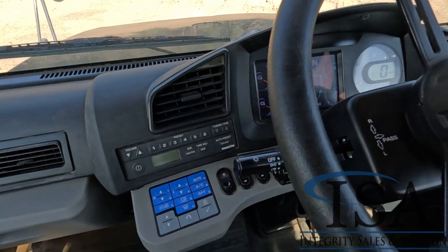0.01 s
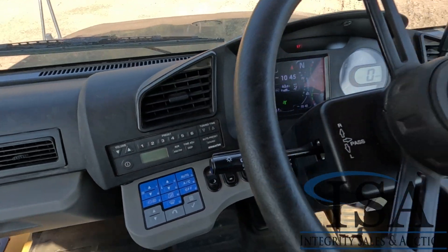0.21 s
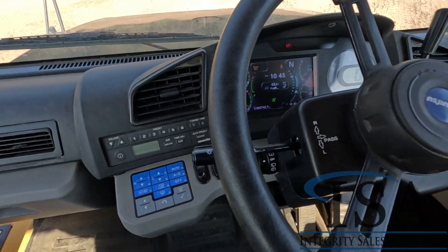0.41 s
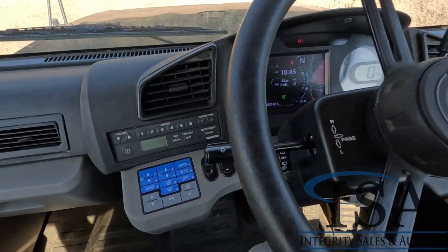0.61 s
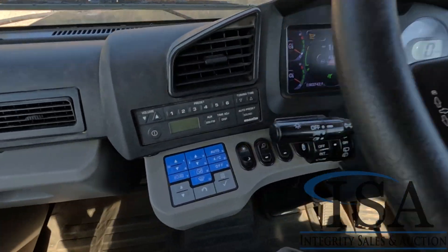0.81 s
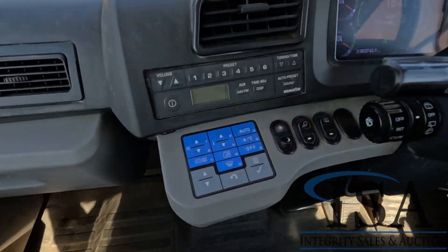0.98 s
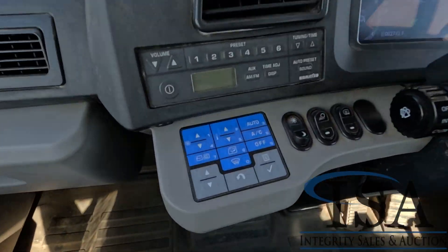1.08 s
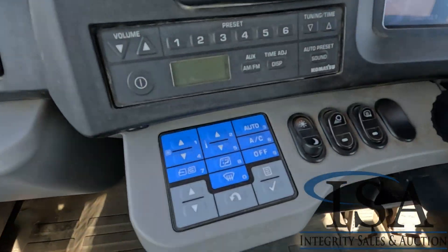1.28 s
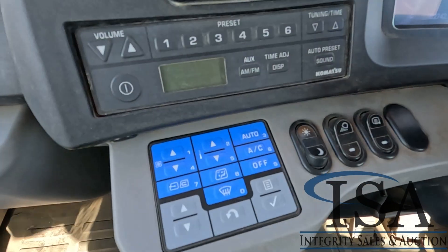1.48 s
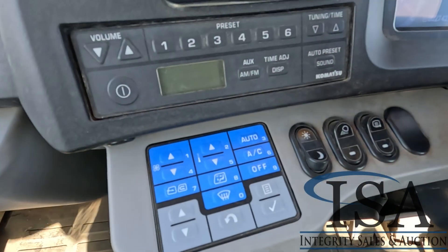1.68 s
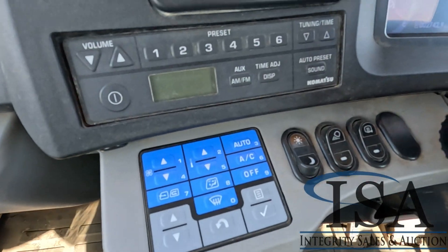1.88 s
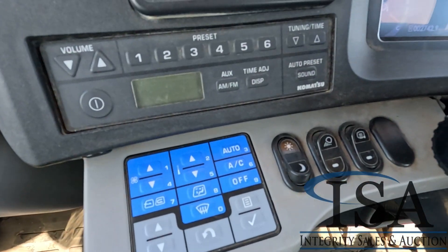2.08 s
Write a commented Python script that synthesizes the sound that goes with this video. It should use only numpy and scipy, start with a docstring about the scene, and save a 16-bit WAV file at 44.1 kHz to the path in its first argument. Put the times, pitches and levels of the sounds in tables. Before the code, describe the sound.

A heavy vehicle door slams shut with a rattle, muffling the idling diesel engine inside the cab

```python
"""Diesel cab, door pulled shut

Inside the cab of a large idling diesel: a wobbling low hum, whining tones, noise rumble and clatter. The door
swings in near the middle: air is squeezed and wobbles as a low tone, the seal hisses, latch and trim rattle as
noise bursts over ringing panel modes, and the shut door lands with a thud. The idle turns dull and swells back
slowly, with small dry ticks; soft modal thumps of someone settling come from the right of the microphone."""
import sys
import numpy as np
from scipy import signal
from scipy.fft import rfft, irfft
from scipy.io import wavfile
from scipy.ndimage import uniform_filter1d

SR = 44100
rng = np.random.default_rng(int(sys.argv[2]) if len(sys.argv) > 2 else 0)


def makeup_ratio(level_db):
    """Linear amplitude ratio for a level in decibels (20 dB per factor of ten)."""
    decades = np.asarray(level_db, float) / 20
    return 10 ** decades


def transcribe(u):
    """Save the signal u as a 16-bit wav file named by the first command-line argument.

    u: samples, shape (n,) or (channels, n), limited to [-1, 1]; the rate is SR.
    q: integer samples, one column per channel.
    """
    v = np.clip(np.atleast_2d(u).T, -1, 1)
    q = np.round(v * 32767).astype(np.int16)
    wavfile.write(sys.argv[1], SR, q)


N = 94815
T = np.arange(N) / SR


def evened(x):
    """Scales to unit rms."""
    return x / np.sqrt(np.mean(x ** 2) + 1e-20)


def read(points, hz):
    """Reads a spectrum on a log-frequency axis."""
    f, value = np.transpose(points)
    return np.interp(np.log(hz + 1), np.log(f + 1), value)


def curve(table, column):
    """One column of a table over time."""
    rows = np.array(table)
    return np.interp(T, rows[:, 0], rows[:, column])


def slow(hz):
    """Random drift of unit rms, mostly below hz."""
    spectrum = rfft(rng.standard_normal(N))
    return evened(irfft(spectrum / (1 + (np.fft.rfftfreq(N, 1 / SR) / hz) ** 4), N))


def sides(db):
    """Left and right gains for a level difference."""
    return makeup_ratio(np.array([[db / 2], [-db / 2]]))


def hiss(spectrum, same, lean, patchy_db, size):
    """Stereo noise of unit rms with a spectrum, left-right likeness and balance, and drifting patches."""
    hop = size // 4
    frames, hz = N // hop + 5, np.fft.rfftfreq(size, 1 / SR)
    a, b, c, d, patches = rng.standard_normal((frames, len(hz), 5)).T
    patches = uniform_filter1d(patches, size=8, axis=0)
    patches = evened(uniform_filter1d(patches, size=8, axis=1))
    like = np.clip(read(same, hz), -1, 1)[:, None]
    half_lean_db = read(lean, hz)[:, None] / 2
    left = a + 1j * b
    right = like * left + np.sqrt(1 - like ** 2) * (c + 1j * d)
    z = np.array([left * makeup_ratio(half_lean_db), right * makeup_ratio(-half_lean_db)])
    z = z * makeup_ratio(read(spectrum, hz)[:, None] + patchy_db * patches)
    return evened(signal.istft(z, nperseg=size, noverlap=size - hop)[1][:, :N])


def ring(modes, spread):
    """One blow on a set of decaying modes, each a little different every time."""
    t = T[:SR // 3]
    out = np.zeros(len(t))
    for (hz, db, t60), (level, tuning) in zip(modes, rng.standard_normal((len(modes), 2))):
        decay = makeup_ratio(db + 2.56 * level - 60 * t / t60)
        out += decay * np.sin(2 * np.pi * hz * (1 + spread * tuning) * t)
    return out


def burst(start_s, length_s, t60_s):
    """Envelope: 1.2 ms rise, hold, exponential release."""
    t = T - start_s
    return np.clip(t / 0.0012, 0, 1) * makeup_ratio(-60 * np.clip(t - length_s, 0, 2) / t60_s)


def add(mix, start_s, sound):
    """Mixes a stereo sound in at its start."""
    part = mix[:, round(start_s * SR):][:, :sound.shape[1]]
    part += sound[:, :part.shape[1]]


FIRING_HZ, FIRING_WOBBLE = 35.46, 0.04  # mean rate; rms wobble as a share of it
HUM_FLUTTER_DB = 1  # rms
# low hum in the cab: firing hum, then, after the door shuts, pulses with the air still swinging in them:
# time_s, level_db
HUM_LEVEL = [(0, -27), (.3, -25), (.45, -22.5), (.58, -24), (.61, -24), (.95, -42), (1.02, -20),
             (1.09, -35.5), (1.16, -30.5), (1.27, -41.5), (1.36, -34), (1.42, -41), (1.55, -31),
             (1.72, -29), (1.8, -46.5), (1.9, -28.5), (1.96, -45), (2.09, -29), (2.15, -39)]
# partials over the hum: multiple of the firing rate, level_db relative to the hum
HUM_ORDERS = [(2, -25), (2.67, -16.5), (3, -25), (4, -21)]


def low_hum(turns):
    """A sine at the firing rate with fluttering partials above it, pulsing once the door is shut."""
    hum = np.sin(2 * np.pi * turns)
    for multiple, db in HUM_ORDERS:
        flutter = makeup_ratio(db + 2.94 * slow(3.9))
        hum = hum + flutter * np.sin(2 * np.pi * (multiple * turns + rng.random()))
    return np.sqrt(2) * makeup_ratio(curve(HUM_LEVEL, column=1) + HUM_FLUTTER_DB * slow(16.5)) * hum


TONE_WIDTH_HZ = 1.2  # rms pitch drift
# tones of pump or fan: pitch_hz, level_db before the idle's changes
WHINE_TONES = [(225, -45.5), (338, -45), (506, -58.5)]


def whine():
    """Turning pump or fan: sines that drift a little in pitch and level."""
    out = np.zeros(N)
    for hz, db in WHINE_TONES:
        cycles = np.cumsum(hz + TONE_WIDTH_HZ * slow(8.1)) / SR
        out += makeup_ratio(db + 1.85 * slow(1.0)) * np.sin(2 * np.pi * cycles)
    return np.sqrt(2) * out


# lowest noise in the cab: frequency_hz, relative density_db
RUMBLE_SPECTRUM = [(4.7, -38), (8.0, -27), (21, -0.5), (38, -4.5), (59, -5.5), (97, -7), (200, -17),
                   (260, -41), (440, -120)]
# dull noise, shared by rumble and drone: frequency_hz, left-right likeness
DULL_SAME = [(60, 0.97), (180, 1), (550, 0.8), (1650, 0.94), (4970, 0.8), (15000, 0.93)]
# its balance: frequency_hz, left minus right_db
DULL_LEAN = [(60, -2.5), (240, -2.5), (950, -1), (3770, 2.5), (15000, -1.5)]


def rumble():
    """Low engine vibration as stereo noise of unit rms."""
    return hiss(RUMBLE_SPECTRUM, DULL_SAME, DULL_LEAN, patchy_db=-0.5, size=4096)


def knocking(turns):
    """Each firing gives the clatter a fresh pulse that decays over the firing cycle."""
    depth, decay_cycles = 0.29, 0.77
    return evened(1 - depth + depth * np.exp(-(turns % 1) / decay_cycles))


# bright engine clatter from outside: frequency_hz, relative density_db
BRIGHT_SPECTRUM = [(120, -33), (200, -2), (339, -4), (365, -24), (430, -13), (812, -5.5), (1100, -8.5),
                   (1590, -15.5), (3810, -24), (6710, -33.5), (12200, -51.5), (15500, -92)]
# its stereo: frequency_hz, left-right likeness
BRIGHT_SAME = [(60, 0.88), (180, 1), (550, 0.98), (1650, 0.72), (4970, 0.64), (15000, 0.64)]
# its balance: frequency_hz, left minus right_db
BRIGHT_LEAN = [(60, 8.5), (240, 2.5), (950, 1.5), (3770, 4), (15000, 3)]


def bright_clatter():
    """Bright engine clatter from outside as stereo noise; it drops as the door shuts, then creeps back."""
    return hiss(BRIGHT_SPECTRUM, BRIGHT_SAME, BRIGHT_LEAN, patchy_db=1.7, size=1024)


# muffled engine noise in the cab: frequency_hz, relative density_db
MUFFLED_SPECTRUM = [(120, -21), (200, -3.5), (263, -2), (307, -3.5), (340, -2), (364, -10), (569, -15),
                    (609, -18), (815, -17.5), (1510, -26), (2250, -30.5), (2720, -31.5), (3200, -35),
                    (4080, -37.5), (8670, -57), (12000, -85), (15600, -115), (22000, -120)]


def muffled_drone():
    """Engine noise inside the cab, with its treble held back."""
    return hiss(MUFFLED_SPECTRUM, DULL_SAME, DULL_LEAN, patchy_db=2.4, size=1024)


# idle heard in the cab: time_s, rumble_db, bright clatter_db, muffled drone_db, change of the tones_db
IDLE_LEVELS = [(0, -40, -45, -49, -5), (.2, -43.5, -42.5, -48, -3), (.45, -31.5, -41, -46.5, -2.5),
               (.6, -38, -40.5, -47, -4.5), (.66, -26, -42.5, -44.5, -6), (.9, -32, -83, -40.5, -20),
               (.97, -46, -75.5, -43, -30), (1.06, -33.5, -98, -46.5, -16), (1.18, -31.5, -87.5, -46, -20),
               (1.3, -32, -82.5, -42, -3), (1.5, -28, -72.5, -44.5, -2.5), (1.7, -33, -66, -42.5, -0.5),
               (1.88, -28.5, -60, -40.5, 0), (2.0, -33.5, -58, -40, 0.5), (2.15, -36, -56, -40, -7)]


def engine():
    """One wobbling firing rate drives hum and knocking; the noises follow their own level curves."""
    turns = np.cumsum(FIRING_HZ * (1 + FIRING_WOBBLE * slow(4.3))) / SR
    rumble_gain, bright_gain, muffled_gain, tone_gain = (makeup_ratio(curve(IDLE_LEVELS, k)) for k in range(1, 5))
    clatter = bright_gain * bright_clatter() + muffled_gain * muffled_drone()
    return low_hum(turns) + tone_gain * whine() + rumble_gain * rumble() + knocking(turns) * clatter


# small dry ticks in the cab: start_s, level_db, length_s, centre_hz, width_hz
TICK_EVENTS = [(0.221, -44, 0.0034, 3800, 6850), (0.227, -51.5, 0.0028, 5400, 9800),
               (1.034, -68.5, 0.019, 6600, 2948), (1.225, -55.5, 0.013, 3820, 1000),
               (1.433, -67.5, 0.0018, 8150, 4870)]


def ticks():
    """Short scratches of noise in one band each, spread around the middle."""
    mid, side = rfft(rng.standard_normal((2, N)) * [[1], [.5]])
    hz = np.fft.rfftfreq(N, 1 / SR)
    stereo = np.array([mid + side, mid - side])
    out = np.zeros((2, N))
    for s, db, length, centre, width in TICK_EVENTS:
        band = evened(irfft(stereo / (1 + (2 * (hz - centre) / width) ** 4), N))
        out += makeup_ratio(db) * burst(s, length, t60_s=.04) * band
    return out


THUMP_DB = -7  # added to every thump
# someone settling, right of the microphone: start_s, level_db, left minus right_db, tilt_db per octave
THUMP_EVENTS = [(1.218, -32.5, -34.5, 8.5), (1.227, -13.5, -12.5, 4), (1.236, -22, -11, 1.5),
                (1.259, -24.5, -11, -9), (1.272, -29, -10, 7), (1.288, -20, -11.5, 1.5),
                (1.299, -29, -11.5, -5), (1.33, -29, -15, -3), (1.479, -30, -20.5, -5.5),
                (1.51, -26, -15, -3.5), (1.529, -20.5, -14.5, 9), (1.556, -29, -25, -4.5),
                (1.564, -23, -11, 0), (1.599, -24, -16.5, 4), (1.611, -24, -10, -1),
                (1.795, -31, -18, 11.5), (1.839, -27.5, -25, 5)]
# padded seat and floor: pitch_hz, relative level_db, t60_s
SEAT_MODES = [(201.6, 1.5, 0.048), (285, 0, 0.056), (403, -5.5, 0.052), (591, -3, 0.03),
              (764, -14.5, 0.023), (993, -20.5, 0.024)]


def thumps():
    """Padded knocks on seat and floor: quickly damped modes with a soft onset."""
    out = np.zeros((2, N))
    soft_onset = np.clip(T[:SR // 3] / 0.0022, 0, 1)
    for s, db, lean_db, tilt_db in THUMP_EVENTS:
        modes = [(hz, m_db + tilt_db * np.log2(hz / 400), t60) for hz, m_db, t60 in SEAT_MODES]
        add(out, s, makeup_ratio(db + THUMP_DB) * sides(lean_db) * ring(modes, spread=0.11) * soft_onset)
    return out


SEAL_S = .652  # the pressure starts to swing
# squeezed air at the microphone: time_s, pitch_hz, level_db
AIR_SWING = [(.59, 0, -40), (.612, 0, -12), (.652, 24, -8.5), (.675, 9, -5.5), (.7, 12.5, -6),
             (.72, 15, -6), (.755, 14.5, -12), (.79, 17, -15), (.82, 19.5, -12.5), (.845, 19.5, -18),
             (.87, 24, -13), (.9, 29.5, -16), (.94, 30, -17), (.99, 30, -40), (1.1, 30, -80)]


def air():
    """Pressure builds one way while the door swings in, then swings as a wobbling low tone."""
    cycles = np.cumsum(curve(AIR_SWING, column=1) * (T > SEAL_S)) / SR
    pressure = makeup_ratio(curve(AIR_SWING, column=2)) * (T > AIR_SWING[0][0])
    return uniform_filter1d(pressure, size=400) * np.cos(2 * np.pi * cycles)


def thud():
    """The door lands: one low, heavily damped sine."""
    start_s, level_db, pitch_hz, t60_s = .6812, 1.5, 95, .028
    t = np.clip(T - start_s, 0, 2)
    return makeup_ratio(level_db - 60 * t / t60_s) * np.sin(2 * np.pi * pitch_hz * t)


# noise of the door parts: frequency_hz, relative density_db
RATTLE_SPECTRUM = [(120, -68.5), (200, -3.5), (300, 5.5), (540, 3.5), (900, -2.5), (1500, -5.5),
                   (3400, -12.5), (4300, -15.5), (7300, -21.5), (9500, -31), (12500, -45.5), (15000, -51),
                   (15700, -84.5)]
# its stereo: frequency_hz, left-right likeness
RATTLE_LIKENESS = [(60, 0.79), (130, 0.98), (290, 0.98), (640, 0.83), (1410, 0.61), (3100, 0.42),
                   (6820, 0.74), (15000, 0.41)]
# its balance: frequency_hz, left minus right_db
RATTLE_BALANCE = [(60, 3), (180, -1), (550, 2), (1650, 2.5), (4970, 2), (15000, 9.5)]


def rattle_noise():
    """Spectrum of the stereo noise that seal and rattles share."""
    return rfft(hiss(RATTLE_SPECTRUM, RATTLE_LIKENESS, RATTLE_BALANCE, patchy_db=1.0, size=512))


def coloured(noise, tilt_db, ring_hz, ring_db):
    """The noise tilted by tilt_db per octave, flat below 300 Hz, with one ringing band."""
    hz = np.fft.rfftfreq(N, 1 / SR) + 1
    tilt = tilt_db * np.log2(np.maximum(hz, 300) / 2000)
    band = ring_db / (1 + (14 * np.log(hz / ring_hz)) ** 2)  # 14: sharpness
    return irfft(noise * makeup_ratio(tilt + band), N)


def seal_hiss(noise):
    """Hiss at the rubber seal swells until the latch strikes, then falls away as steeply."""
    latch_s, level_db, slope_db_per_s = 0.669, -31, 500
    swell = makeup_ratio(level_db - slope_db_per_s * abs(T - latch_s))
    return swell * coloured(noise, tilt_db=2, ring_hz=3200, ring_db=12)


RATTLE_T60_S, CAB_T60_S, CAB_DB = .028, .2, -12.5  # direct release; cab tail and its relative level
HOLD_SAG_DB, GRAIN_DB = -6, 4  # sag over each hold; rms of the grainy flicker
PANEL_DB, PANEL_WIDTH = -3.5, 0.2  # panel level relative to its rattle; gain of the side signal
# latch and trim: start_s, level_db before colouring, length_s, tilt_db per octave, ringing_hz, ringing_db
RATTLE_EVENTS = [(0.674, -23.5, 0.014, 5, 3100, 8.5), (0.6851, -22, 0.014, 1.5, 7200, 12.5),
                 (0.7125, -24.5, 0.0098, 1.5, 3460, 9), (0.723, -28.5, 0.019, -2, 3420, 9.5),
                 (0.7414, -24.5, 0.018, 3, 2250, 2), (0.773, -25, 0.017, 2.5, 2860, 8.5),
                 (0.788, -35, 0.026, -3.5, 3830, 3), (0.814, -35.5, 0.026, 0.5, 1385, 0),
                 (0.8332, -36, 0.0098, .5, 2250, -6), (0.847, -28, 0.0094, 0.5, 3050, -3),
                 (0.869, -35.5, 0.0088, -1, 2050, 1), (0.892, -48, 0.015, -3.5, 2050, -9),
                 (0.911, -58, 0.0073, -5.5, 1500, -2)]
# door panel and cab: pitch_hz, relative level_db, t60_s
PANEL_MODES = [(90.7, 0.5, 0.52), (136.6, -3.5, 0.71), (241, 2, 0.18), (323.6, 0, 0.12),
               (382.3, -3.5, 0.17), (541, -6, 0.16), (625, -4.5, 0.23), (765, -5.5, 0.15), (908, -2, 0.09),
               (1005, -10.5, 0.33)]


def rattles(noise):
    """Latch and trim knock as grainy bursts with a short cab tail, each also ringing the door panel."""
    grain = makeup_ratio(GRAIN_DB * slow(1000))
    out = np.zeros((2, N))
    for s, db, length, tilt_db, ring_hz, ring_db in RATTLE_EVENTS:
        sag = makeup_ratio(HOLD_SAG_DB * np.clip((T - s) / length, 0, 1))
        direct = burst(s, length, RATTLE_T60_S) * sag * grain
        tail = makeup_ratio(CAB_DB) * burst(s, length, CAB_T60_S)
        out += makeup_ratio(db) * (direct + tail) * coloured(noise, tilt_db, ring_hz, ring_db)
        mid = ring(PANEL_MODES, spread=0.014)
        side = PANEL_WIDTH * ring(PANEL_MODES[2:], spread=0.049)  # the two lowest modes stay central
        add(out, s, makeup_ratio(db + PANEL_DB) * np.array([mid + side, mid - side]))
    return out


def door():
    """Seal, latch and trim share one noise; the thud is the landing of the whole door."""
    noise = rattle_noise()
    return seal_hiss(noise) + rattles(noise) + thud()


def scene():
    """Everything in the cab, from the idle behind to the door."""
    return engine() + ticks() + thumps() + air() + door()


def low_pass(x):
    """Removes everything above the highest recorded frequency."""
    return signal.sosfilt(signal.butter(12, 15640, fs=SR, output="sos"), x)


def record(dry):
    """The finished mix as it is stored."""
    return low_pass(dry)


dry = scene()
out = record(dry)
transcribe(out)
```